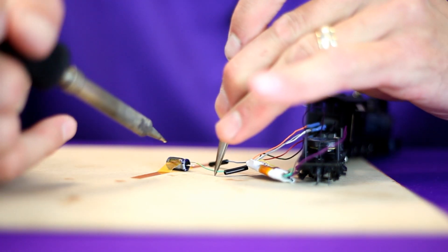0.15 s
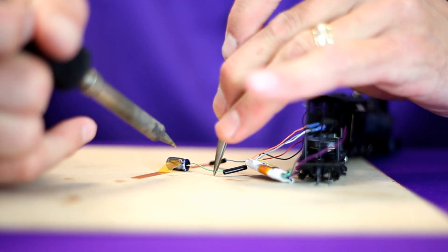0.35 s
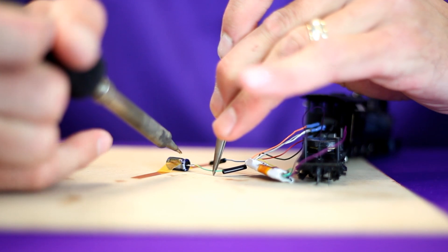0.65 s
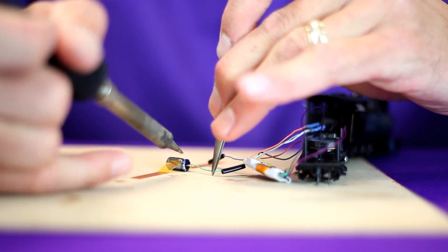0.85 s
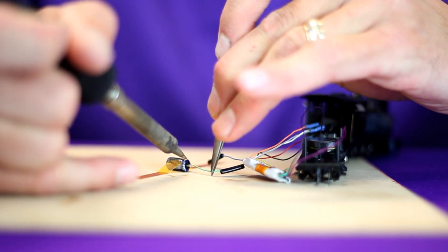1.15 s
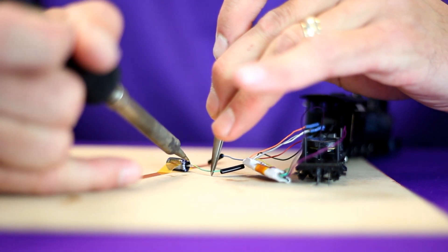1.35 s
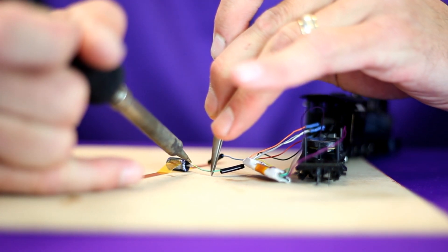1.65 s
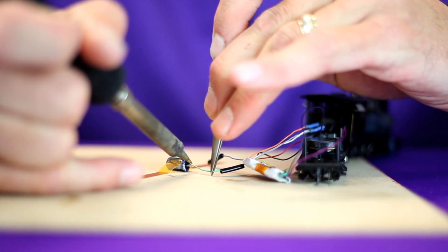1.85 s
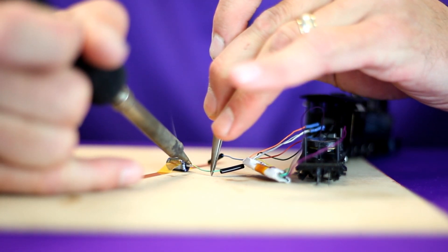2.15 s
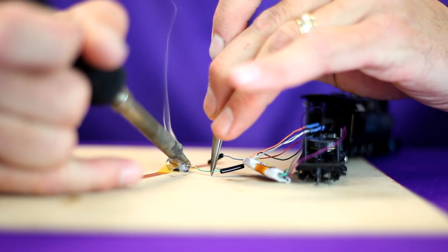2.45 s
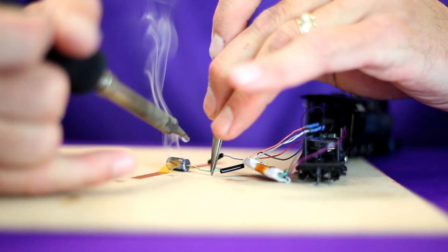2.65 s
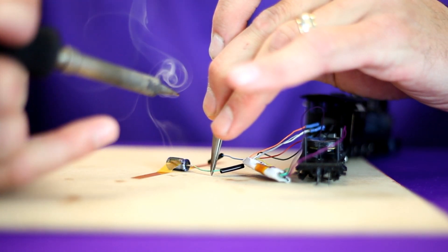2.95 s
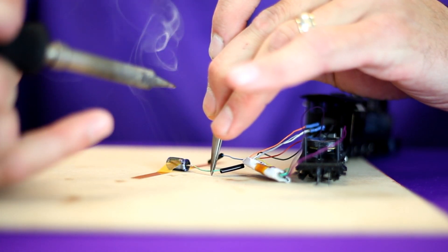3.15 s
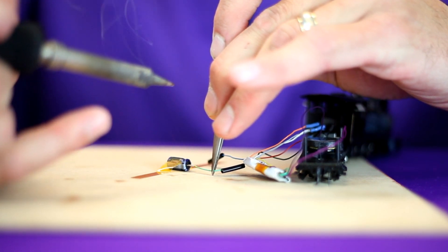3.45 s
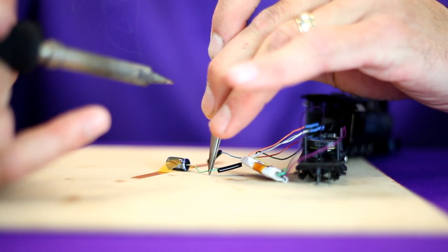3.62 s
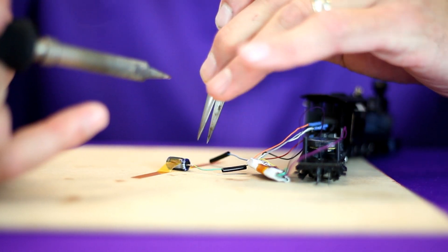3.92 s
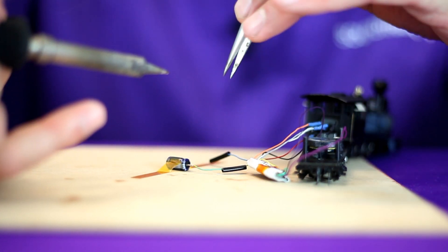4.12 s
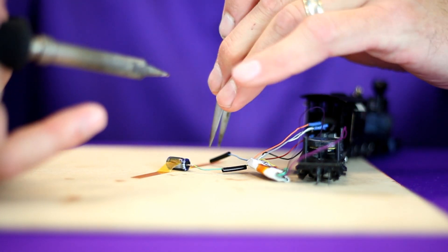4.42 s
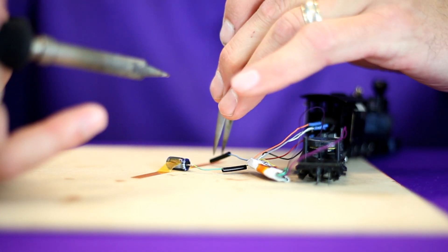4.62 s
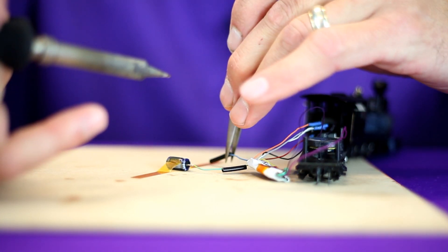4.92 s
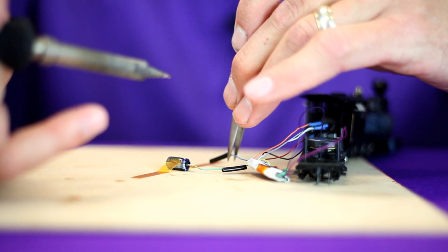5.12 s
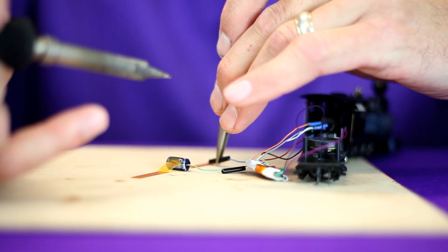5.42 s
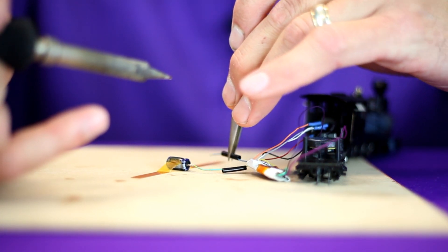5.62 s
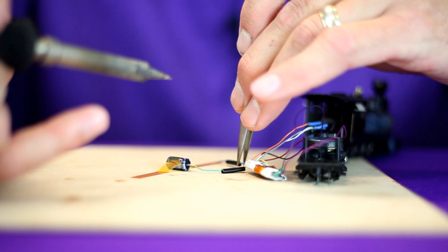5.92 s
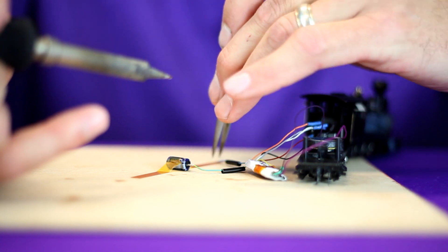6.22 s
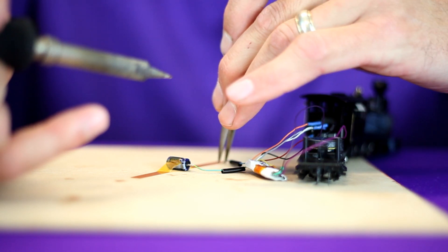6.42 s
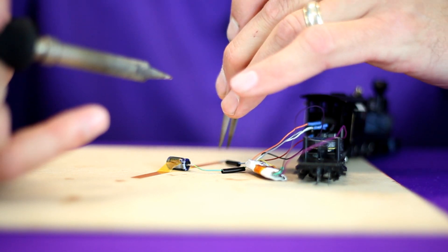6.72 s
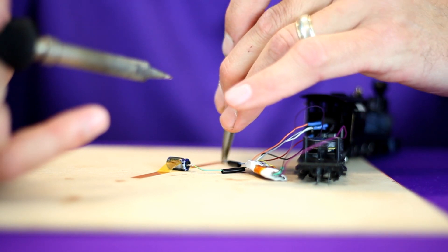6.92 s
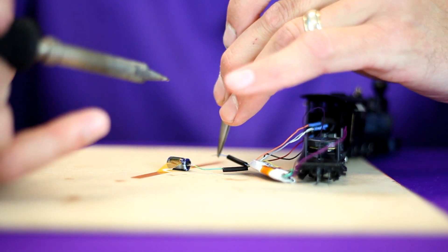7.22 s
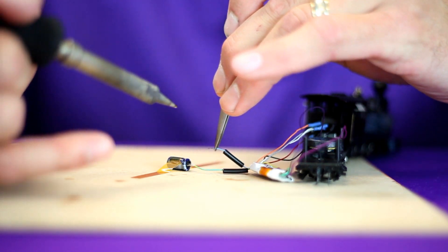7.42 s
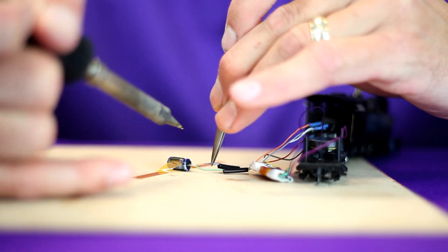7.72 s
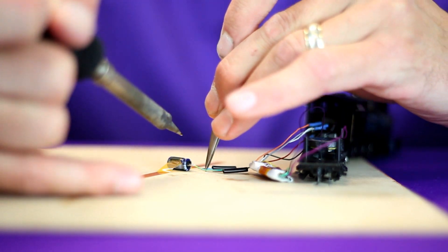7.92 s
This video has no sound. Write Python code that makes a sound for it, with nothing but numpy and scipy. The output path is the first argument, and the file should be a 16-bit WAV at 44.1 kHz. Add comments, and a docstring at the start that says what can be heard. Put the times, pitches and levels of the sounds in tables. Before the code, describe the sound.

Fine metal tweezers tick and tap on tiny parts, with small hollow knocks on a wooden board over a deep, slowly swelling machinery hum.

```python
"""Metal tweezers and an iron tip tick on small parts and knock a wooden board, close to a microphone.
Ticks are rough contacts ringing one short resonance; knocks ring the damped modes of the board.
Scrapes and the rustle of hands and sleeves are noise grains coloured by air, board and microphone port.
Distant machinery hums in low tones, one of them swelling; a small room and hiss lie under it."""
import sys
import numpy as np
from scipy import signal
from scipy.fft import rfft, irfft
from scipy.io import wavfile
from scipy.ndimage import uniform_filter1d

SR = 44100
rng = np.random.default_rng(int(sys.argv[2]) if len(sys.argv) > 2 else 0)


def put_to_file(sound):
    """Save the sound as 16-bit audio at rate SR, in the file named by the first command-line argument."""
    columns = np.atleast_2d(sound).T  # one column per channel
    safe = np.clip(columns, -1, 1)
    whole_steps = np.round(safe * 32767)
    wavfile.write(sys.argv[1], SR, whole_steps.astype(np.int16))


N = 355666

# Blows that reach the board. Each row: start in seconds, peak level in dB, favoured frequency in Hz,
# fall away from it in dB per octave, time constant of the contact rub in ms.
BLOWS = [(0.017, -36.5, 785, 6, 4.6), (0.097, -39, 475, 14, 2.9), (0.176, -43.5, 475, 20, 2.6),
         (0.199, -38, 490, 0.5, 6.3), (0.719, -42, 570, -4, 3.7), (0.738, -35.5, 495, 10, 0.87),
         (0.932, -44, 510, -1, 1.5), (1.24, -57, 454, -3, 5.4), (2.322, -56, 800, 25, 3.7),
         (3.451, -53, 590, -12, 1.9), (3.614, -38, 510, 16, 3), (3.684, -42, 507, 3, 2),
         (3.792, -41, 920, 5, 5), (3.8, -38, 960, 10, 3.9), (4.382, -48.5, 545, 7, 1.5),
         (5.157, -47.5, 665, 16, 1.3), (5.413, -26.5, 790, 5.5, 1.1), (5.426, -40, 241, 9, 1.6),
         (5.488, -35.5, 830, 3, 5.4), (5.641, -53, 829, 2, 3), (5.684, -47, 780, 10, 3.2),
         (5.709, -48, 825, 32, 5.4), (5.874, -60, 700, 5, 2), (5.888, -44.5, 760, 12, 2.6),
         (6.322, -37.5, 790, 0, 3.8), (6.334, -23.5, 810, 2.5, 2.6), (6.358, -35.5, 805, 14, 3.4),
         (6.418, -35, 467, 6, 6.7), (6.449, -38.5, 830, 6, 9.2), (6.889, -32.5, 710, 1.5, 1.2),
         (6.947, -26, 530, 8, 2.1), (6.961, -69, 800, 8, 3.6), (7.0, -20.5, 860, 7.5, 3.8),
         (7.011, -29, 830, 39, 0.97), (7.101, -37, 870, 2, 6.8), (7.892, -52.5, 594, 0, 3.5),
         (7.988, -46, 524, 7, 1.3)]
# Board modes. Each row: frequency in Hz, gain in dB.
BOARD_MODES = [(160, -2.5), (244, 1.5), (330, -1), (478, 3.5), (633, 1.5), (742, 3.5), (823, 3), (898, 0.5),
               (997, -2), (1140, -8), (1304, -3), (1560, -9.5), (1790, -4.5), (2030, -8.5), (2250, -11),
               (2590, -30), (3200, -30)]
# Motion of skin and cloth. Each row: time in seconds, level in dB.
HAND_MOTION = [(0.0, -65), (0.24, -65), (0.36, -70.5), (1.12, -74.5), (1.6, -81.5), (2.3, -83.5),
               (2.85, -76.5), (3.3, -86.5), (3.8, -86.5), (4.06, -68), (4.25, -70.5), (4.47, -72),
               (4.62, -81.5), (5.2, -85), (6.8, -95), (7.12, -74.5), (7.4, -71.5), (7.67, -61.5),
               (7.8, -71), (8.06, -81)]


def undb(db):
    """Amplitude ratio from dB."""
    return 10 ** (np.asarray(db) / 20)


def unit(x):
    """Scale to rms 1."""
    return x / np.sqrt(np.mean(x ** 2))


def band(x, hz, width_hz):
    """Two-pole resonance, gain 1 at the centre."""
    b, a = signal.iirpeak(min(hz, 0.45 * SR), hz / width_hz, fs=SR)
    return signal.lfilter(b, a, x)


def walk(rate_hz):
    """Random levels held for 1 / rate_hz seconds, then slewed; rms about 1."""
    hold = int(SR / rate_hz)
    steps = np.repeat(rng.standard_normal(N // hold + 1), hold)
    return unit(uniform_filter1d(steps, hold)[:N])


def curve(table):
    """Interpolate (time, level) rows to every sample."""
    time_s, level_db = np.transpose(table)
    return np.interp(np.arange(N) / SR, time_s, level_db)


def add(out, start_s, grain, peak_db):
    """Mix in one grain, scaled to its peak level."""
    i = int(start_s * SR)
    grain = grain[:len(out) - i]
    out[i:i + len(grain)] += undb(peak_db) * grain / np.abs(grain).max()


def hum():
    """Machine and mains hum: steady sines, close ones beating, plus one sine that swells and fades."""
    # Each row: frequency in Hz, level in dB rms.
    steady_tones = [(27.08, -49.3), (32.66, -53.4), (38.78, -46.2), (58.21, -63.5), (58.73, -58.6),
                    (60.01, -58), (65.03, -67.8), (67.89, -53.6), (108.26, -69.5), (120.04, -75),
                    (260.3, -76)]
    # Level of the swelling tone. Each row: time in seconds, level in dB rms.
    swell_levels = [(0.0, -46), (0.24, -44), (0.45, -37), (0.85, -32), (1.39, -34.5), (1.7, -43),
                    (2.31, -36), (2.8, -38), (3.1, -42), (3.85, -43.5), (4.5, -32.5), (5.0, -37),
                    (5.37, -45.5), (5.79, -33.5), (6.2, -35), (6.55, -48.5), (6.95, -35), (7.41, -31),
                    (8.06, -40.5)]
    swell_hz = 29.8
    t = np.arange(N) / SR
    tones = undb(curve(swell_levels)) * np.sin(2 * np.pi * swell_hz * t)
    for hz, rms_db in steady_tones:
        tones += undb(rms_db) * np.sin(2 * np.pi * (hz * t + rng.random()))
    return np.sqrt(2) * tones  # rms to amplitude


def floor():
    """Room air and microphone hiss: Gaussian noise shaped in the spectrum."""
    # Each row: frequency in Hz, density in dB per Hz.
    hiss_density = [(15, -55), (30, -66.5), (54, -69), (76, -80), (100, -79.5), (140, -88), (240, -88.5),
                    (350, -99), (700, -104), (1200, -112), (2500, -115), (3700, -112), (5000, -118),
                    (9000, -121), (15500, -124)]
    table_hz, table_db = np.transpose(hiss_density)
    hz = np.maximum(np.arange(N // 2 + 1) * SR / N, 1)
    density_db = np.interp(np.log(hz), np.log(table_hz), table_db)
    spectrum = rfft(rng.standard_normal(N)) * undb(density_db)
    return irfft(spectrum * np.sqrt(SR / 2), N)


def port(x):
    """Upper resonances of the microphone port, three filter stages each."""
    # Each row: frequency in Hz, width of the first stage in Hz (the others are twice as wide), gain in dB.
    port_peaks = [(11900, 800, 1), (12770, 2600, 9)]
    out = 0
    for hz, width_hz, db in port_peaks:
        narrow = band(x, hz, width_hz)
        out = out + undb(db) * band(band(narrow, hz, 2 * width_hz), hz, 2 * width_hz)
    return out


def dull(x, cutoff_hz=4380.0):
    """Sixth-order lowpass: the microphone hears little between its resonances."""
    return signal.sosfilt(signal.butter(6, cutoff_hz, fs=SR, output="sos"), x)


def rubbing(grains):
    """Grains heard directly, through the board modes and through the port, each at rms 1."""
    # Each row: frequency in Hz, width of the first stage in Hz (the second is twice as wide), gain in dB.
    direct_peaks = [(2260, 1420, 7), (3500, 380, 10), (3130, 1800, 4), (1510, 550, -46)]
    direct, board = 0, 0
    for hz, width_hz, db in direct_peaks:
        direct = direct + undb(db) * band(band(grains, hz, width_hz), hz, 2 * width_hz)
    for k, (hz, db) in enumerate(BOARD_MODES):
        board = board + (-1) ** k * undb(db) * band(grains, hz, 0.18 * hz)  # alternating signs
    return unit(dull(direct)), unit(dull(board, 2310.0)), unit(port(grains))


def rustle():
    """Skin and cloth: dense noise grains, one motion flickering in all three ranges."""
    board_db, top_db = -0.2, -16  # relative to the direct part
    rest_db = -82  # hands resting on the board keep its part above this
    flicker_db = 1.5 * walk(30) + 1.5 * walk(250)
    direct, board, top = rubbing(rng.standard_normal(N) * undb(flicker_db))
    motion = undb(curve(HAND_MOTION))
    board_level = np.hypot(motion * undb(board_db), undb(rest_db))
    return motion * (direct + undb(top_db) * top) + board_level * board


def rub(grit, ms, db):
    """Rough rub that swells for ms and lets go; db sets its energy against a unit impulse."""
    u = 1000 * np.arange(len(grit)) / SR / max(ms, 0.1)
    rough = grit * u * np.exp(-u)
    return undb(db) * rough / np.linalg.norm(rough)


def contact(grit, ms, grit_db):
    """Contact force: one clean unit impulse plus a rub."""
    force = rub(grit, ms, grit_db)
    force[0] += 1
    return force


def knocks():
    """Blows ring the damped board modes, most near the favoured frequency, while the part chatters."""
    cycles_to_60_db = 42  # wood damps every mode by 60 dB in this many cycles
    build_s = 0.00013  # the ring builds as the wave spreads
    # Random spread of mode levels and of mode frequencies, drawn anew for each blow.
    scatter_db, detune_share = 1.2, 0.0029
    grit_db, chatter_db, chatter_ms = -6, -7, 15.8  # the struck part chatters on the same spot
    out, t = np.zeros(N), np.arange(8192) / SR
    mode_hz, mode_db = np.transpose(BOARD_MODES)
    decay = np.exp(-np.log(1000) * np.outer(mode_hz / cycles_to_60_db, t))
    fade = decay * (1 - np.exp(-t / build_s))
    for start_s, peak_db, near_hz, fall_db, rub_ms in BLOWS:
        scatter, detune = rng.standard_normal((2, len(BOARD_MODES)))
        rough, chatter = rng.standard_normal((2, 4096))
        octaves_away = np.abs(np.log2(mode_hz / near_hz))
        share_db = mode_db - fall_db * octaves_away + scatter_db * scatter
        shifted_hz = mode_hz * (1 + detune_share * detune)
        rings = np.sin(2 * np.pi * np.outer(shifted_hz, t)) * fade
        force = contact(rough, rub_ms, grit_db) + rub(chatter, chatter_ms, chatter_db)
        knock = signal.fftconvolve(undb(share_db) @ rings, force)
        add(out, start_s, dull(knock), peak_db)
    return out


def scrapes():
    """Dragged parts and wires, and parts rattling after each blow: coarse grains that thin out."""
    # Each row: start in seconds, length in seconds, level of the direct part in dB at full swell,
    # board part in dB relative to it, top end in dB relative to it.
    drags = [(0.212, 0.38, -70, -23, -10), (0.561, 0.096, -66.5, -0.5, -31), (2.29, 0.16, -66.5, 1, -14),
             (2.434, 0.073, -63, -22, -21), (2.492, 0.049, -61, -5.5, -22), (2.6, 0.12, -71.5, 0, -7),
             (3.439, 0.053, -66.5, 10.5, -27), (3.59, 0.25, -72.5, 13, -17),
             (3.844, 0.051, -70.5, 8.5, -29), (4.038, 0.024, -71, -16, -8), (5.384, 0.022, -68, -17, -14),
             (5.59, 0.2, -72, 6.5, -20), (2.274, 0.046, -69, -3, -20), (3.787, 0.028, -60, 3, -22),
             (5.48, 0.027, -72.5, 11.5, -28), (6.45, 0.024, -76, 13.5, -25), (6.987, 0.061, -77, 6, -30),
             (7.069, 0.073, -64.5, 14, -21), (7.212, 0.081, -66, 6.5, -27), (7.483, 0.065, -70.5, -7, -8),
             (7.979, 0.085, -72.5, 7, -7)]
    # One row: length in seconds, level in dB relative to the blow's peak,
    # board part and top end in dB relative to the rattle's direct part.
    rattle = (0.05, -34, 4, -23)
    rattle_s, under_blow_db, rattle_board_db, rattle_top_db = rattle
    rattles = [(start_s, rattle_s, peak_db + under_blow_db, rattle_board_db, rattle_top_db)
               for start_s, peak_db, *_ in BLOWS]
    slip_db = 3.5 * walk(300) + 3 * walk(90)  # stick-slip
    parts = rubbing(rng.standard_normal(N) * undb(slip_db))
    gains = np.zeros((3, N))
    for start_s, length_s, db, board_db, top_db in drags + rattles:
        i, u = int(start_s * SR), np.linspace(0, 1, int(length_s * SR))
        shape = np.minimum(u / 0.15, 1) * np.minimum((1 - u) / 0.6, 1)  # fast start, slow end
        levels = undb([db, db + board_db, db + top_db])
        gains[:, i:i + len(u)] += np.outer(levels, shape)
    return np.sum(gains * parts, axis=0)


def faint_ticks():
    """Rows of faint ticks at random moments that crowd where the rustle is loud."""
    count, least_db, spread_db = 16, -62, 2  # levels spread exponentially upward in dB
    low_hz, high_hz = 2000, 3800
    top_db, snap_db = -24, -4
    busy = np.cumsum(undb(curve(HAND_MOTION) / 2))
    when, size, pitch = rng.random((count, 3)).T
    start_s = np.searchsorted(busy / busy[-1], when) / SR
    peak_db = least_db - spread_db * np.log(size)
    ring_hz = low_hz + (high_hz - low_hz) * pitch
    return [(s, db, hz, top_db, snap_db) for s, db, hz in zip(start_s, peak_db, ring_hz)]


def ticks():
    """A millisecond contact rings one short resonance over a broad snap; its edge excites the port."""
    # Each row: start in seconds, peak level of ring and snap in dB, ring frequency in Hz,
    # peak of the top end in dB relative to that level, gain of the snap in dB.
    metal_ticks = [(0.234, -53, 2050, -18, -4), (0.5744, -44, 3660, -22, 3), (0.6916, -53, 3500, -35, -15),
                   (0.733, -48, 1980, -24, 1), (1.034, -50, 2190, -15, -6), (1.1336, -55.5, 2330, -10, -4),
                   (1.1585, -48, 3500, -11, -11), (1.2422, -43, 2480, -16, 12),
                   (1.6987, -57, 3820, -23, -19), (2.2486, -48.5, 3380, -23, -13),
                   (2.2845, -47, 4000, -25, -5), (2.2885, -32, 3600, -17, -10),
                   (2.3241, -30, 3500, -21, -10), (2.3517, -28, 3600, -29, -13.5),
                   (2.434, -47.5, 3500, -32, -12), (2.4563, -50, 3520, -34, -13),
                   (2.448, -49, 3600, -32, -10), (2.472, -55, 3600, -32, -6), (2.5092, -51, 2980, -29, -13),
                   (2.521, -49, 3600, -31, -12), (2.666, -59, 3280, 0, -14),
                   (3.4476, -39.5, 3450, -26, -12), (3.6142, -45, 2040, -33, -6),
                   (3.6245, -42.5, 3250, -34, -13), (3.661, -53, 3300, -30, -8),
                   (3.6813, -45, 3750, -13, -6), (3.709, -58, 3330, -27, -14), (3.766, -48, 2730, -13, -14),
                   (3.798, -48, 2050, -16, -9), (3.853, -55, 3400, -21, -21), (4.135, -47, 2550, -36, -10),
                   (4.3245, -40, 4240, -10, -10.5), (4.372, -55, 4360, -26, -19),
                   (4.3844, -43, 5320, -21, -13), (4.444, -63, 2100, -24, -13),
                   (4.4954, -42, 3870, -24, -8), (4.7782, -55, 2030, -23, 3),
                   (5.1585, -49.5, 1880, -32, -6), (5.3803, -56, 2780, -7, -9),
                   (5.4012, -44, 3480, -13, -12), (5.4142, -37, 2180, -38, -7), (5.49, -52, 2000, -28, -5),
                   (5.681, -57, 2090, -12, -27), (5.7025, -46.5, 1970, -1.5, 2),
                   (5.8726, -62, 2030, -7, -15), (5.888, -58, 1970, -25, -9),
                   (6.3345, -35.5, 2600, -6.5, -9), (6.8906, -48.5, 2580, -11, -14),
                   (6.9488, -35.5, 2580, -18, -20), (7.001, -29, 2560, -23, -19.5),
                   (7.1, -51, 2120, -28, -9), (7.1963, -51.5, 3830, -32, -20),
                   (7.2192, -55, 2050, -26, -15), (7.3046, -45, 2880, -13, 3),
                   (7.3766, -54, 3230, -23, -12), (7.4362, -52, 3740, -28, -7), (7.664, -50, 2170, -24, -4),
                   (7.796, -55, 3780, -3, -10)]
    rub_ms = 0.89
    out = np.zeros(N)
    for start_s, peak_db, ring_hz, top_db, snap_db in metal_ticks + faint_ticks():
        force = contact(rng.standard_normal(2048), rub_ms, grit_db=0.0)
        ring = band(band(force, ring_hz, 0.16 * ring_hz), ring_hz, 0.13 * ring_hz)
        broad = band(force, 3070.0, 1300.0) + undb(-4.5) * band(force, 4720.0, 280.0)
        snap = dull(broad, 5020.0)
        add(out, start_s, ring + undb(snap_db) * snap, peak_db)
        add(out, start_s, port(force), peak_db + top_db)
    return out


def room(x):
    """Small room: dense noise echoes that fade in, decay and lack treble, added to the direct sound."""
    t60_s, tail_db, dull_hz, rise_s = 0.3, -21, 3750, 0.0016
    t = np.arange(SR // 2) / SR
    decay = np.exp(-np.log(1000) * t / t60_s)
    tail = rng.standard_normal(len(t)) * decay * np.minimum(t / rise_s, 1)
    b, a = signal.butter(2, dull_hz, fs=SR)
    tail = signal.lfilter(b, a, tail)
    tail /= np.linalg.norm(tail)
    return x + undb(tail_db) * signal.fftconvolve(x, tail)[:N]


def scene():
    """Only the contacts excite the room; rustle, hum and hiss are added without echoes."""
    contacts = ticks() + knocks() + scrapes()
    return (room(contacts) + rustle() + hum() + floor())[None]


def record(dry):
    """The recorder cuts the top steeply, with an elliptic lowpass."""
    top_hz = 15750
    return signal.sosfilt(signal.ellip(10, 0.2, 80, top_hz, fs=SR, output="sos"), dry)


dry = scene()
out = record(dry)
put_to_file(out)
```